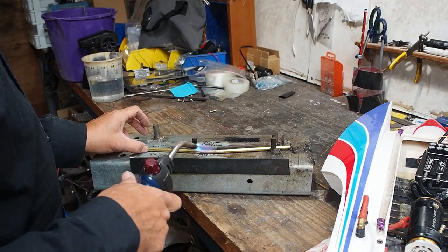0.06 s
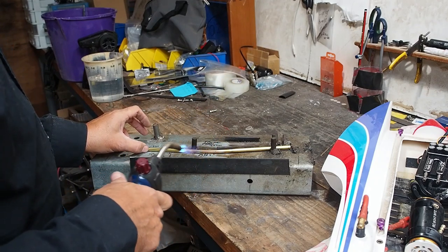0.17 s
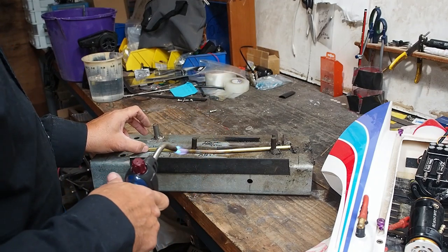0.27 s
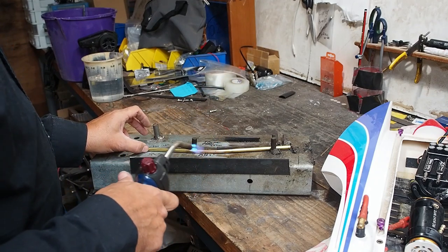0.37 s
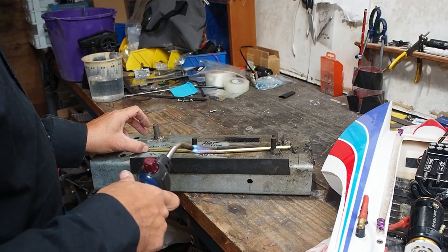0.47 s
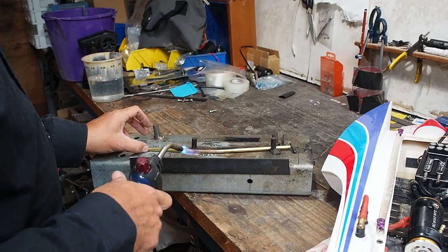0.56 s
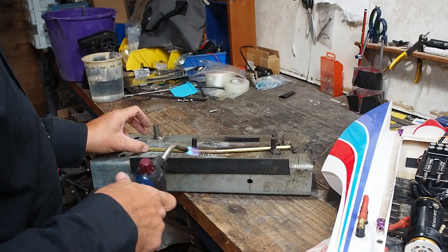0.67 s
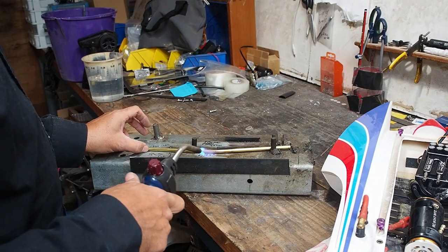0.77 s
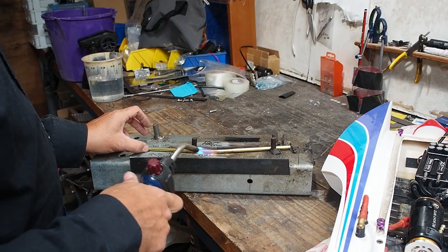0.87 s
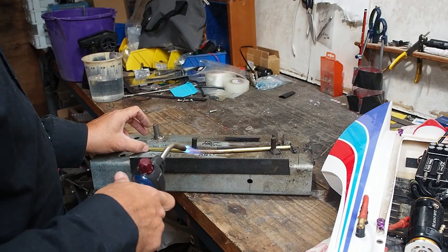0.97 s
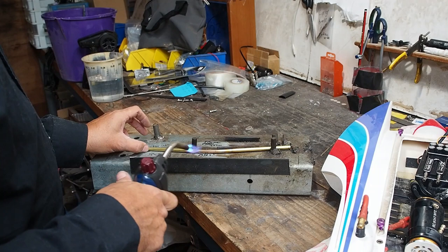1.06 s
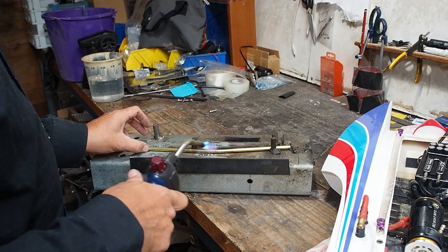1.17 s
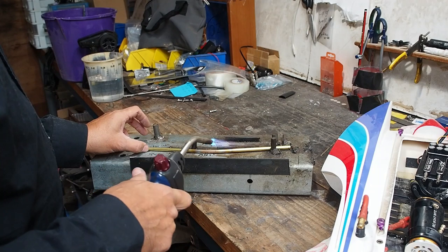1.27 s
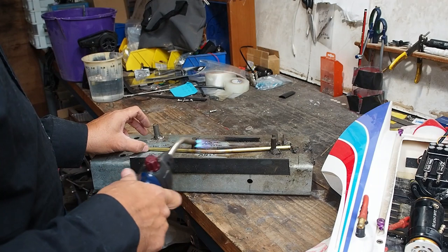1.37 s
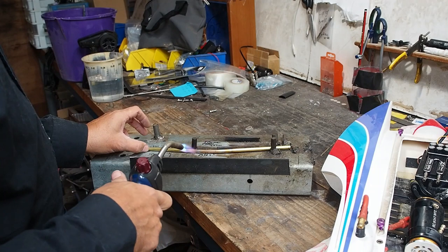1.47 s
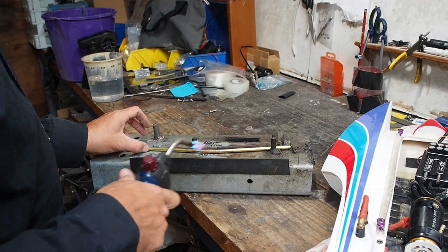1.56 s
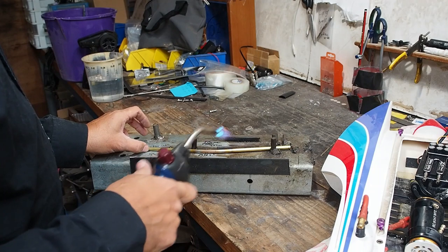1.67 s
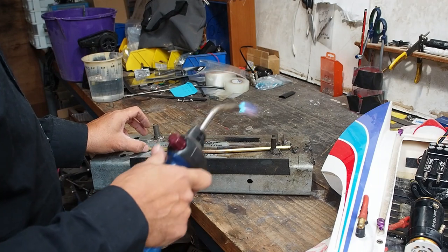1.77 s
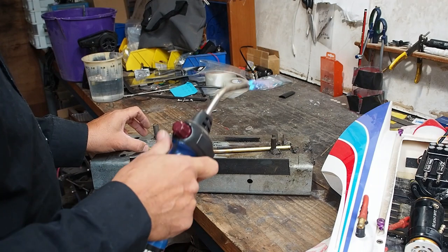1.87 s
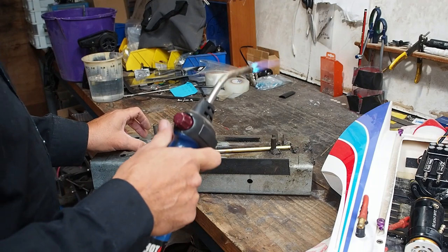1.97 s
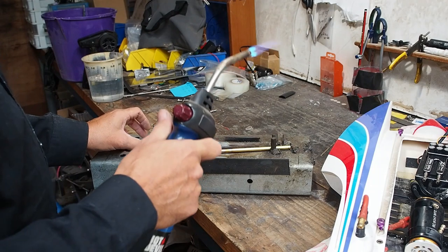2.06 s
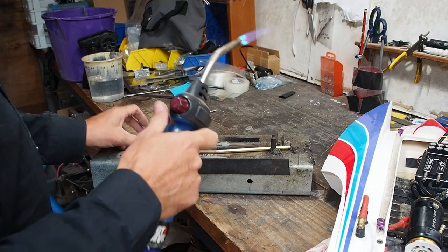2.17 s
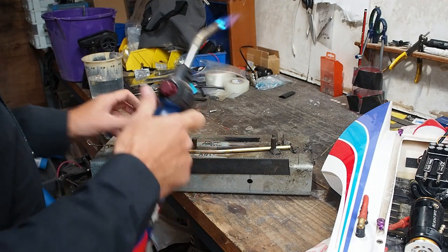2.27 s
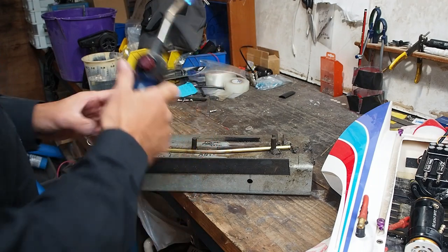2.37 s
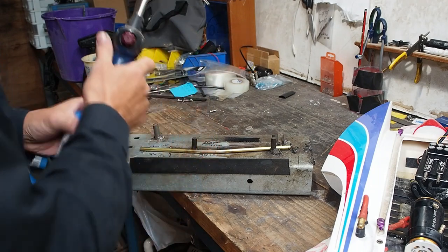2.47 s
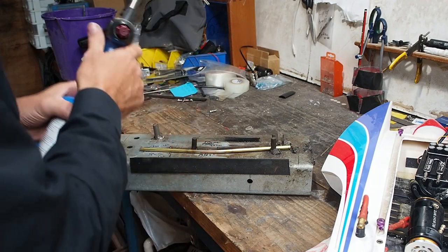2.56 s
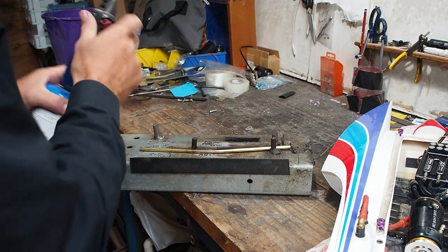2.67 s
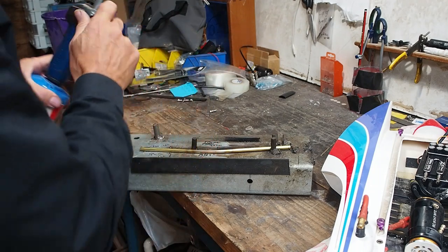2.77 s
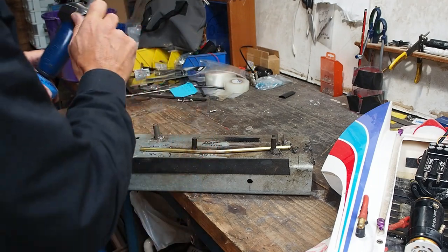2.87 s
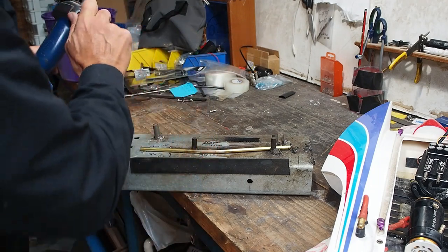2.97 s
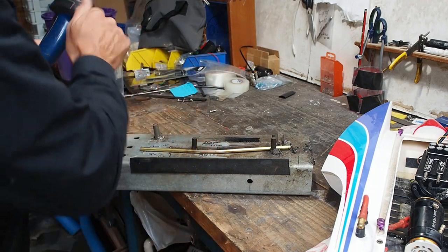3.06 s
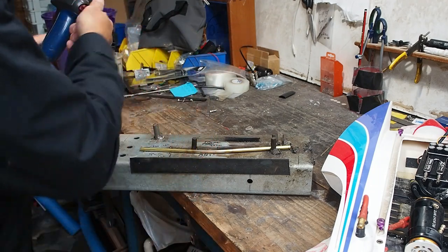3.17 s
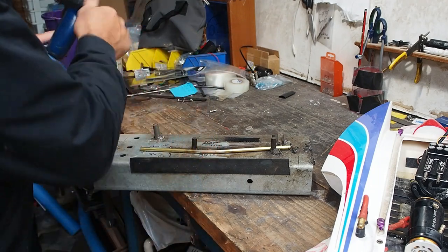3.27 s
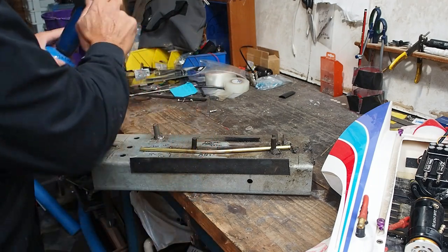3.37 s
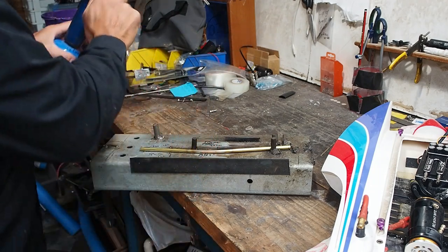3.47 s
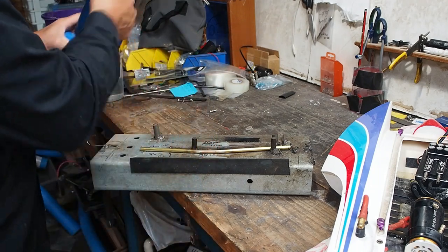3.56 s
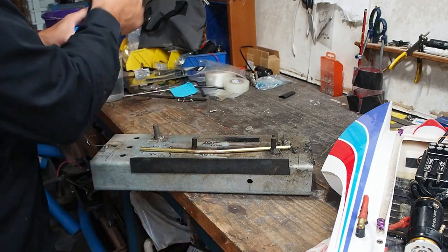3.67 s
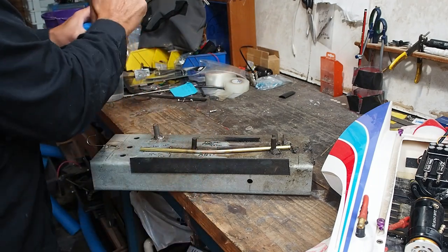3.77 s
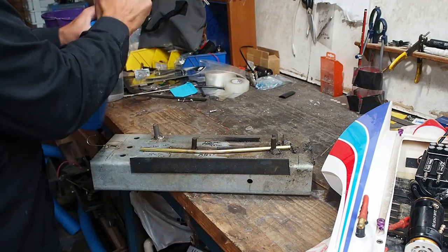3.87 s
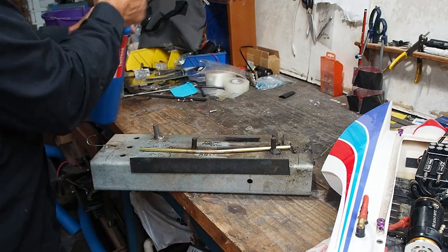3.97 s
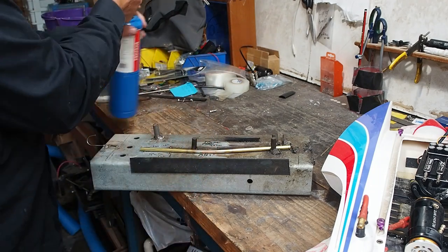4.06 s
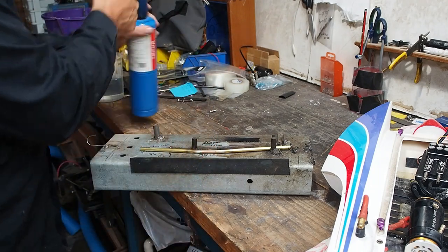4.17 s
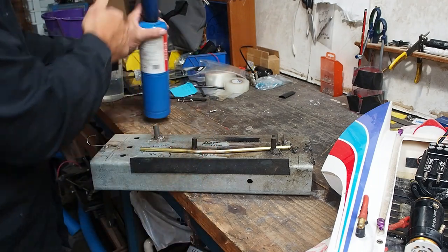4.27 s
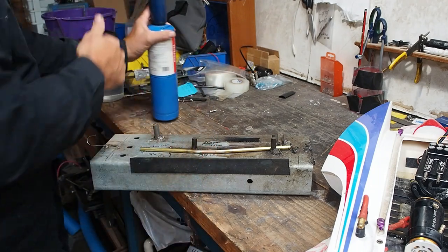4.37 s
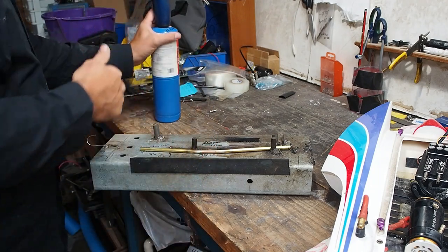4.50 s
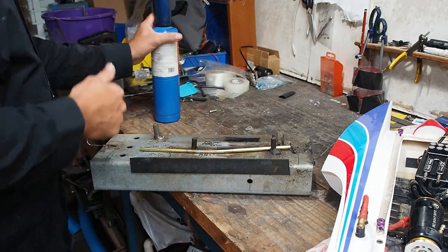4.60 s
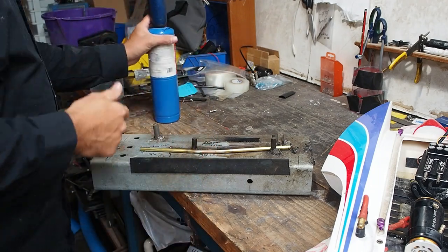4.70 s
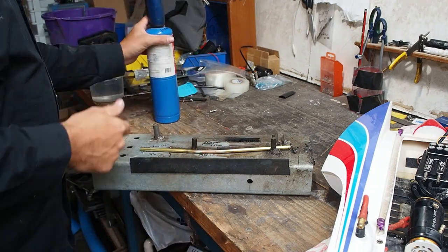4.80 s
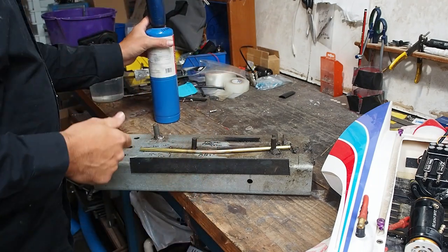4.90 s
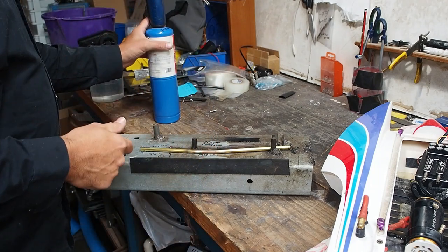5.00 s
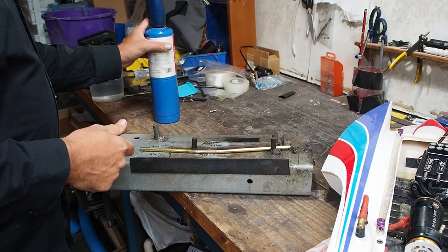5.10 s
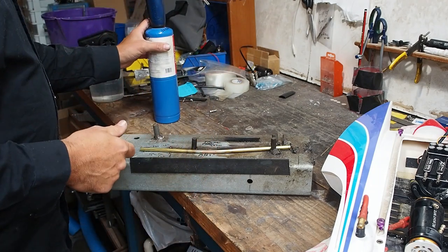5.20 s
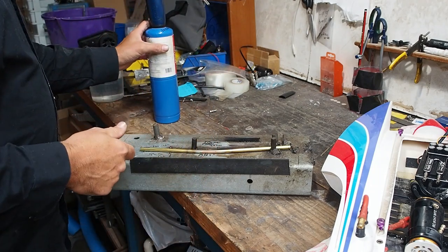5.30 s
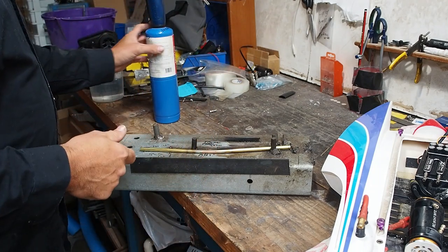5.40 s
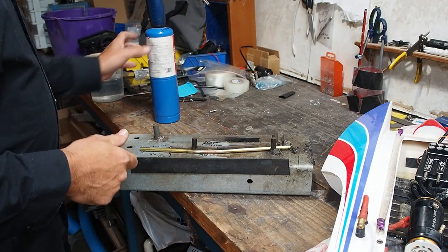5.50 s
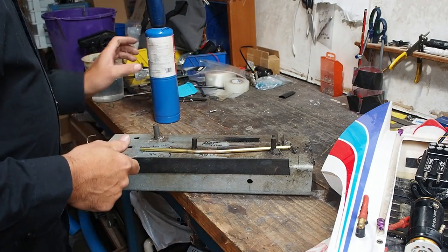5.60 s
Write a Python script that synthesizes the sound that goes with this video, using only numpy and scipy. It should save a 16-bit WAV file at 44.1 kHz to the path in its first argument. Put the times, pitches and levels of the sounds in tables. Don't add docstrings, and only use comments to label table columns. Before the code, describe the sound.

A handheld gas torch roars steadily against a brass tube, shuts off abruptly, then faint knob ticks and a dull bottle knock on a wooden bench.

```python
import sys
import numpy as np
from scipy import signal
from scipy.fft import rfft, irfft
from scipy.io import wavfile

SR = 44100
rng = np.random.default_rng(int(sys.argv[2]) if len(sys.argv) > 2 else 0)


def put_to_file(sound):
    columns = np.atleast_2d(sound).T
    safe = np.clip(columns, -1, 1)
    whole_steps = np.round(safe * 32767)
    wavfile.write(sys.argv[1], SR, whole_steps.astype(np.int16))


def magnitude_from_level(level_db):
    exponent = np.asarray(level_db, float) / 20
    return 10 ** exponent


N = 248724

# time in seconds, loudness in dB.
GAS_FLOW = [(0, -25.5), (.25, -27.5), (.5, -26.5), (.86, -26.5), (1.0, -27.5), (1.15, -26.5), (1.5, -27),
            (1.72, -27.5), (2.1, -26.5), (2.3, -27), (2.56, -25), (3.0, -28)]
# frequency in Hz, level in dB per Hz.
FLAME_ON_TUBE = [(50, -27.5), (150, -8.5), (250, -8.5), (400, -4.5), (600, -0.2), (850, 0), (1200, -6),
                 (1700, -8), (2500, -10), (3600, -8.5), (5200, -18), (7500, -15), (11500, -24)]
# frequency in Hz, level in dB per Hz.
FLAME_SWUNG = [(50, -41), (150, -7), (250, -3.5), (400, -5.5), (600, -2.5), (850, -3), (1200, -3.5),
               (1700, -4), (2500, -8), (3600, -9.5), (5200, -14.5), (7500, -16.5), (11500, -21.5)]
# frequency in Hz, level in dB per Hz.
FLAME_IN_AIR = [(50, -26), (150, -11.5), (250, -8), (400, -8), (600, -4.5), (850, 2), (1200, -1),
                (1700, -6), (2500, -11.5), (3600, -10), (5200, -14.5), (7500, -12.5), (11500, -22.5)]
# centre in Hz, width in Hz, height in dB.
TUBE_PEAKS = [(250, 53, -7.5), (352, 160, 1.5), (464, 27, -8.5), (550, 34, -1), (930, 420, 3),
              (1015, 55, 7), (1210, 260, -4.5), (1538, 69, -6.5), (1601, 23, 9), (1700, 40, -2.5),
              (2000, 38, 7.5), (2247, 85, 4.5), (2400, 70, -10), (2710, 54, -7), (3110, 40, -7.5),
              (3790, 270, 3.5), (5390, 710, 6.5), (6400, 190, 2.5), (6510, 320, -7.5), (7400, 950, 0),
              (10000, 320, -1.5), (11400, 490, -1)]
# centre in Hz, width in Hz, height in dB.
SWUNG_PEAKS = [(253, 45, -15), (340, 58, 3.5), (456, 33, -5), (600, 41, -2), (730, 70, 3.5), (1000, 63, 8),
               (2380, 150, -4.5), (3040, 110, -9), (4000, 250, 4.5), (4970, 180, -1), (8500, 1100, 5),
               (11060, 600, -5)]
# centre in Hz, width in Hz, height in dB.
AIR_PEAKS = [(241, 36, -10.5), (333, 40, 0), (476, 48, -2.5), (580, 28, 1), (664, 31, -9), (984, 89, 5),
             (1324, 61, -15), (1520, 150, 3.5), (1730, 63, -4), (2550, 170, -1.5), (4000, 140, 6.5),
             (6360, 540, -6), (7600, 750, -1.5), (11100, 760, -1.5)]
# time in seconds, notch in Hz.
BENCH_ECHO = [(0, 5800), (.4, 5850), (.6, 6300), (1.1, 6250), (1.22, 5600), (1.33, 5200), (1.45, 5800),
              (1.6, 6000)]
# frequency in Hz, left-right likeness from 0 to 1.
LIKENESS = [(60, 1), (130, 0.97), (290, 1), (640, 0.95), (1410, 0.82), (3100, 0.53), (6820, 0.36),
            (15000, 0.1)]
# frequency in Hz, left minus right in dB.
LEAN = [(60, -2), (130, -0.5), (290, 0), (640, 1.0), (1410, 1), (3100, -1), (6820, 5), (15000, -3.5)]
# frequency in Hz, lead of the left in radians.
LEFT_LEAD = [(0, 0), (2760, -0.13), (3190, 0.36), (4310, 1.4), (4820, 0.56), (12500, -0.86), (14000, 1.8),
             (15400, -0.9)]
# frequency in Hz, level in dB per Hz.
SKIN_RUB = [(290, -45), (500, -18), (886, -4), (1550, -8), (2500, -8.5), (3010, -4), (3930, -6), (4490, -7),
            (6090, -6.5), (12000, -12.5), (15600, -44), (22000, -120)]
# centre in Hz, width in Hz.
VALVE_HOLLOWS = [(2400, 1000), (3800, 1500)]
# start in seconds, length in seconds, level in dB, low ring in dB, high ring in dB.
STROKES = [
    (3.503, 0.1, -46, -2, 1),
    (3.88, 0.017, -51, 0, -8),
    (3.906, .015, -48, 0, 3),
    (3.967, 0.06, -47, 3, -8),
]
# start in seconds, peak in dB, centre in Hz, width in Hz, T60 in seconds.
TICKS = [(3.367, -38.5, 3300, 1204, .06), (3.649, -29, 14000, 3000, .082), (3.783, -28, 2380, 200, 0.03),
         (3.783, -29.5, 2830, 4000, 0.044), (3.864, -36, 2400, 600, .06), (3.864, -40, 3000, 5000, .015),
         (3.966, -31, 3820, 500, .053), (3.965, -33, 6500, 2000, .06), (3.986, -37, 896, 600, 0.032),
         (4.848, -37.5, 5060, 1200, 0.073), (4.847, -33, 10000, 9000, 0.06),
         (4.951, -33.5, 380, 169, 0.026), (5.03, -46, 7000, 8000, .11)]
# start in seconds, blow in dB, contact brightness in Hz, rattle in dB.
KNOCKS = [
    (4.4579, -9.5, 960, -17),
    (4.4624, -10.5, 780, -18),
    (4.471, -22, 1000, -18.5),
    (4.478, -21, 700, -29.5),
    (4.492, -19, 500, -43),
    (4.519, -32, 1200, -36),
    (4.768, -28.5, 1380, -48),
    (4.773, -29, 1000, -30.5),
    (4.789, -35, 705, -44),
]
# frequency in Hz, level in dB, T60 in seconds.
BENCH_MODES = [(246, -31, 0.1), (303, -19.5, 0.28), (365, -6, 0.11), (423, -1.5, 0.059), (520, -6.5, 0.11),
               (690, -11, 0.06), (759, -13, 0.13), (895, -12, 0.22), (1030, -19, 0.13), (1220, -23, 0.13)]
# band centre in Hz, level in dB, T60 in seconds.
RATTLE_TAIL = [(272, -16, 0.54), (500, -6, .4), (1000, -15, 0.32), (2000, -42, 0.35), (3400, -8.5, 0.057),
               (6430, -15, 0.16), (10000, -21, 0.24), (15200, -30, 0.43)]
# frequency in Hz, pitch wander from 0 to 1.
PANELS = [(125, 0.05), (183, 0.02)]
# peak in seconds, low panel in dB, high panel in dB.
LOADS = [
    (4.480, -15.5, -30),
    (4.560, -37, -27),
    (4.62, -43, -39),
    (4.68, -40, -40),
    (4.725, -39, -39),
    (4.792, -30, -44),
    (4.862, -41, -42),
    (4.902, -30.5, -53),
    (4.976, -42.5, -49),
    (5.035, -43, -44.5),
]
# frequency in Hz, level in dB per Hz.
SHOP_AIR = [(15, -23), (40, -14), (60, -12.5), (90, -10.5), (135, -8.5), (190, -11.5), (270, -19),
            (430, -16.5), (620, -21.5), (1300, -22), (2200, -26), (4500, -28), (7000, -29.5), (12000, -32)]
# centre in Hz, width in Hz, height in dB.
SHOP_PEAKS = [(1015, 280, 8.5), (1650, 420, 4.5), (3470, 500, 6), (11200, 1900, -1), (13600, 1500, 2.5),
              (15500, 1200, 11)]
# frequency in Hz, left-right likeness from 0 to 1.
SHOP_LIKENESS = [(30, 0.4), (180, 0.44), (550, 0.4), (1650, 0.3), (5000, 0), (15000, 0)]
# frequency in Hz, gain in dB.
CAPSULE = [(20, 1), (11000, 1.5), (12300, 0), (13200, 2), (14200, 4), (15700, -7.5), (20000, -10)]

LIFT_S, LIFT_TAKES_S = 1.67, 0.042
RAISED_S, RAISE_TAKES_S = 2.28, 0.41
CLOSE_S, CLOSE_EASE_S, CLOSE_DB_PER_S = 3.082, 0.021, 185
HISS_FOLLOWS, ROAR_FOLLOWS = 0.78, 1.18
POP_RARITY, POP_DB, POP_SPREAD_DB, POP_HZ, POP_WIDTH_HZ = 3.0, 17, 8, 1400, 2200
ECHO_GAIN = 0.38
GRIP_DB_PER_S, LET_GO_DB_PER_S, HIGH_RING_FADES_DB_PER_S = 700, 263, 132
TICK_LEAN = 1.3
SOFT_RATTLE_DULLS = 0.15
LOAD_RISE_DB_PER_S, LOAD_FALL_DB_PER_S, FIRST_LOAD_RISE_S = 480, 480, 0.0073
ROLL_DB, ROLL_ENDS_S = -53, 5.05
ROOM_T60_S, ROOM_DB = 0.17, -6
SHOP_DB = -50
OFFSET = -0.0045


def torch():
    t, hz = np.arange(N) / SR, bin_hz()
    closing_db = CLOSE_DB_PER_S * CLOSE_EASE_S * np.logaddexp(0, (t - CLOSE_S) / CLOSE_EASE_S)
    level_db = in_time(GAS_FLOW)[0] - closing_db
    flame = burning(np.maximum(level_db - np.mean(GAS_FLOW, axis=0)[1], -30))
    lift = np.clip((t - LIFT_S) / LIFT_TAKES_S + 0.5, 0, 1)
    raised = np.clip((t - RAISED_S) / RAISE_TAKES_S + 0.5, 0, 1)
    on_tube = peaked(bench_echo(flame), TUBE_PEAKS, FLAME_ON_TUBE)
    swung = peaked(flame, SWUNG_PEAKS, FLAME_SWUNG)
    in_air = peaked(flame, AIR_PEAKS, FLAME_IN_AIR)
    flame = (1 - lift) * on_tube + lift * (1 - raised) * swung + raised * in_air
    aside = magnitude_from_level(at_hz(LEAN, hz) / 2) * np.exp(0.5j * at_hz(LEFT_LEAD, hz))
    flame = irfft(rfft(flame) * [aside, 1 / aside], N)
    return magnitude_from_level(level_db - 0.8) * flame / np.std(flame[:, :3 * SR])


def burning(swing_db):
    hiss_db, roar_db = (HISS_FOLLOWS - 1) * swing_db, (ROAR_FOLLOWS - 1) * swing_db
    flutter, sputter, swell = drift(230), drift(37), drift(22)
    white = rng.standard_normal((2, 2, N))
    edges_hz, flame = np.geomspace(45, 17000, num=24), 0
    for k, (low, high) in enumerate(zip(edges_hz, edges_hz[1:])):
        sos = signal.butter(2, [low, high], "band", fs=SR, output="sos")
        mid, side = signal.sosfilt(sos, white[k % 2])
        hz = np.sqrt(low * high)
        bright = np.clip(np.log2(hz / 1000) / 3, 0, 1)
        roar = np.exp(-(np.log2(hz / 720) / 0.5) ** 2)
        db = bright * hiss_db + roar * roar_db
        db = db + (0.5 + bright) * flutter + 0.5 * sputter + 0.16 * swell + 0.54 * drift(5.1)
        flame = flame + magnitude_from_level(db) * pair(mid, side, at_hz(LIKENESS, hz))
    excess = white[1, 1, ::-1] - POP_RARITY
    pops = (excess > 0) * magnitude_from_level(POP_DB + POP_SPREAD_DB * np.minimum(excess, 1))
    return flame + band(pops, POP_HZ, POP_WIDTH_HZ)


def bench_echo(flame):
    notch_hz, = in_time(BENCH_ECHO)
    treble = band(flame, 6000, 5000)
    treble = band(treble[:, ::-1], 6000, 5000)[:, ::-1]
    return flame + ECHO_GAIN * late(treble, 2.5 / notch_hz)


def knob():
    t = np.arange(N) / SR
    skin = coloured(SKIN_RUB, LIKENESS) * magnitude_from_level(2.1 * drift(250))
    low_ring, high_ring = [rms_one(band(skin, hz, width_hz)) * magnitude_from_level(3.3 * drift(50))
                           for hz, width_hz in VALVE_HOLLOWS]
    out = np.zeros((2, N))
    for s, length, db, low_db, high_db in STROKES:
        grip_db = GRIP_DB_PER_S * np.maximum(s - t, 0)
        let_go_db = LET_GO_DB_PER_S * np.maximum(t - s - length, 0)
        high_db = high_db - HIGH_RING_FADES_DB_PER_S * np.maximum(t - s, 0)
        rub = magnitude_from_level(2.5) * skin + magnitude_from_level(low_db - 6) * low_ring + magnitude_from_level(high_db - 3.5) * high_ring
        out += magnitude_from_level(db - grip_db - let_go_db) * rub
    return out * magnitude_from_level([[0.6], [-0.6]])


def ticks():
    out, span = np.zeros((2, N)), 6000
    t = np.arange(span) / SR
    grits = rng.standard_normal((len(TICKS), 2, span))
    for (s, db, hz, width_hz, t60), grit in zip(TICKS, grits):
        dying = pair(*grit, at_hz(LIKENESS, hz)) * magnitude_from_level(-60 * t / t60)
        burst = band(dying, hz, width_hz)
        i, pan_db = round(s * SR), TICK_LEAN * at_hz(LEAN, hz)
        pan = magnitude_from_level([[pan_db / 2], [-pan_db / 2]])
        out[:, i:i + span] += magnitude_from_level(db) * pan * burst / np.abs(burst).max()
    return out


def knocks():
    out, span = np.zeros((2, N)), 20000
    t = np.arange(span) / SR
    chances = rng.standard_normal((len(KNOCKS), 2, span + 16))
    for (s, db, bright_hz, rattle_db), chance in zip(KNOCKS, chances):
        contact = signal.butter(4, bright_hz, fs=SR, output="sos")
        push = -signal.sosfilt(contact, signal.unit_impulse(span))
        body = sum(magnitude_from_level(level_db + 2 * d) * ring(push, hz, t60)
                   for (hz, level_db, t60), d in zip(BENCH_MODES, chance[0, span:]))
        tail, dull_db = 0, SOFT_RATTLE_DULLS * (KNOCKS[0][3] - rattle_db)
        for hz, level_db, t60 in RATTLE_TAIL:
            mid, side = rms_one(band(chance[:, :span], hz, 0.85 * hz))
            fall_db = level_db - dull_db * max(np.log2(hz / 1000), 0) - 60 * t / t60
            tail = tail + magnitude_from_level(fall_db) * pair(mid, side, at_hz(LIKENESS, hz))
        i = round(s * SR)
        onset = 1 - np.exp(-t / 0.0007)
        out[:, i:i + span] += magnitude_from_level(db) * body + magnitude_from_level(rattle_db) * tail * onset
    return out


def rocking():
    t, out = np.arange(N) / SR, 0
    s, *panel_db = np.transpose(LOADS)
    since = t - s[:, None]
    swell_db = np.where(since < 0, LOAD_RISE_DB_PER_S * since, -LOAD_FALL_DB_PER_S * since)
    roll_db = ROLL_DB - LOAD_FALL_DB_PER_S * np.maximum(t - ROLL_ENDS_S, 0)
    for (hz, wander), db in zip(PANELS, panel_db):
        turns = np.cumsum(hz * (1 + wander * drift(25.7))) / SR
        shake_db = np.maximum(np.max(db[:, None] + swell_db, axis=0), roll_db)
        out = out + np.sqrt(2) * magnitude_from_level(shake_db + 1.6 * drift(30)) * np.sin(2 * np.pi * turns)
    return out * np.clip((t - KNOCKS[0][0]) / FIRST_LOAD_RISE_S, 0, 1)


def room(x):
    t = np.arange(N) / SR
    spray = rng.standard_normal((2, N)) * magnitude_from_level(-60 * t / ROOM_T60_S) * (t > 0.003)
    mid, side = rfft(spray / np.sqrt(np.sum(spray[0] ** 2)))
    walls = pair(mid, side, at_hz(LIKENESS, bin_hz()))
    return x + magnitude_from_level(ROOM_DB) * irfft(rfft(x) * walls, N)


def shop():
    level = magnitude_from_level(SHOP_DB + 0.5 * drift(5))
    return level * peaked(coloured(SHOP_AIR, SHOP_LIKENESS), SHOP_PEAKS)


def in_time(rows):
    s, *columns = np.transpose(rows)
    return [np.interp(np.arange(N) / SR, s, c) for c in columns]


def bin_hz():
    return np.maximum(np.arange(N // 2 + 1) * SR / N, 1)


def at_hz(points, hz):
    point_hz, value = np.transpose(points)
    return np.interp(np.log(hz), np.log(point_hz), value)


def rms_one(x):
    return x / np.sqrt(np.mean(x ** 2) + 1e-20)


def drift(rate):
    r = np.exp(-16 * np.pi * rate / SR)
    slow = signal.lfilter([1], [1, -2 * r, r * r], rng.standard_normal(N // 8 + 4002))[4000:]
    return np.interp(np.arange(N) / 8, np.arange(len(slow)), rms_one(slow))


def pair(mid, side, alike):
    alike = np.clip(alike, 0, 1)
    return np.sqrt((1 + alike) / 2) * mid + np.sqrt((1 - alike) / 2) * side * [[1], [-1]]


def coloured(spectrum, likeness):
    hz = bin_hz()
    mid, side = rfft(rng.standard_normal((2, N)))
    colour = magnitude_from_level(at_hz(spectrum, np.minimum(hz, 12000)))
    return rms_one(irfft(colour * pair(mid, side, at_hz(likeness, hz)), N))


def ring(x, hz, t60):
    r, w = magnitude_from_level(-60 / (t60 * SR)), 2 * np.pi * hz / SR
    return signal.lfilter([0, np.sin(w)], [1, -2 * r * np.cos(w), r * r], x + 1e-18)


def late(x, delay_s):
    return np.array([np.interp(np.arange(N) - delay_s * SR, np.arange(N), c) for c in x])


def peaked(x, peaks, spectrum=((1, 0), (2, 0))):
    hz = bin_hz()
    db = at_hz(spectrum, hz) + sum(db / (1 + (2 * (hz - f) / w) ** 2) for f, w, db in peaks)
    return irfft(rfft(x) * magnitude_from_level(db), N)


def band(x, hz, width_hz):
    edges_hz = [max(hz - width_hz / 2, 30), min(hz + width_hz / 2, 18000)]
    return signal.sosfilt(signal.butter(2, edges_hz, "band", fs=SR, output="sos"), x)


def scene():
    background = shop()
    no_bass = signal.butter(4, 92, "high", fs=SR, output="sos")
    bench = signal.sosfilt(no_bass, knocks() + rocking())
    return room(torch() + knob() + ticks()) + bench + background


def top_cut(x):
    return signal.sosfilt(signal.butter(12, 15810, fs=SR, output="sos"), x)


def record(dry):
    heard = irfft(rfft(dry) * magnitude_from_level(at_hz(CAPSULE, bin_hz())), N)
    return top_cut(heard + OFFSET)


dry = scene()
out = record(dry)
put_to_file(out)
```